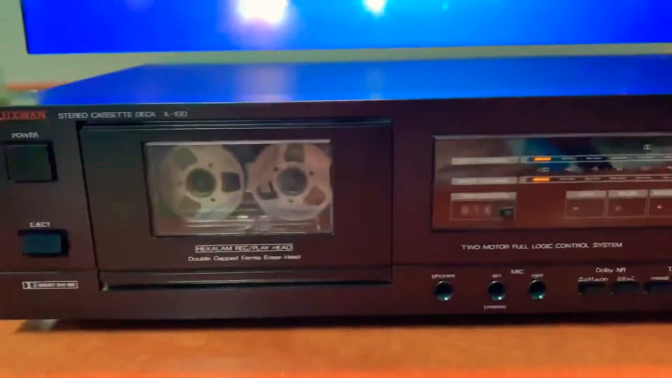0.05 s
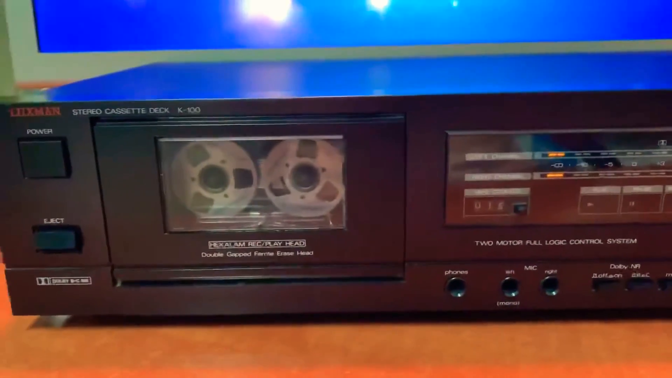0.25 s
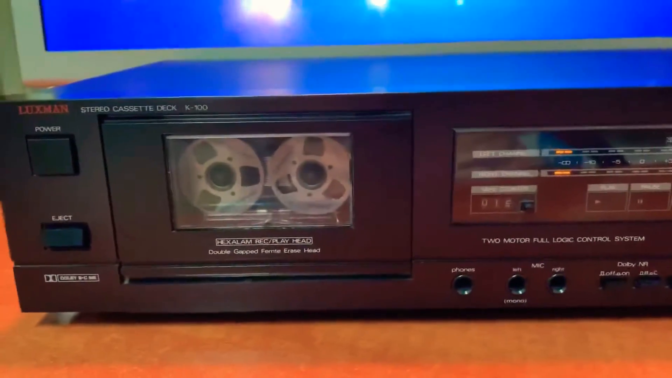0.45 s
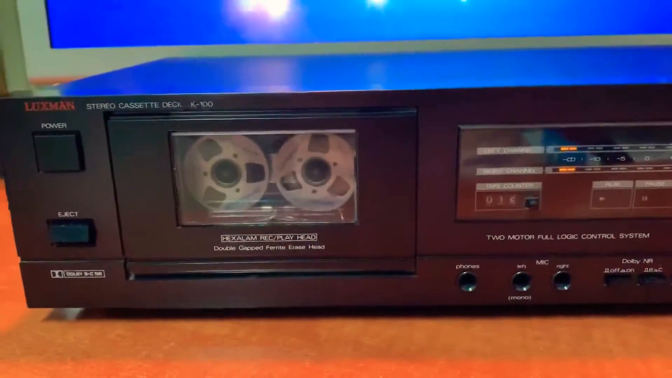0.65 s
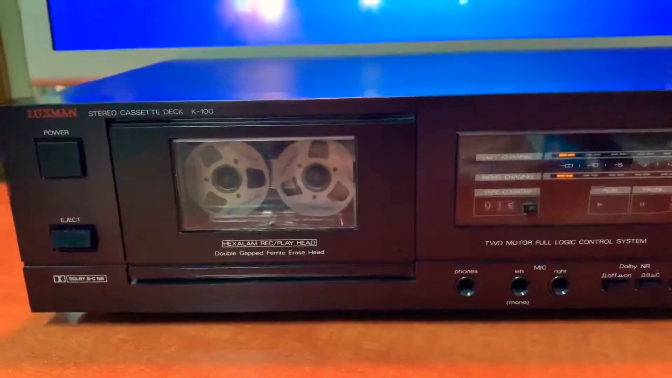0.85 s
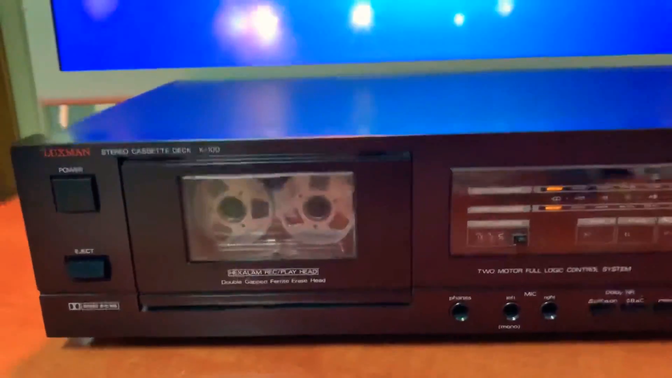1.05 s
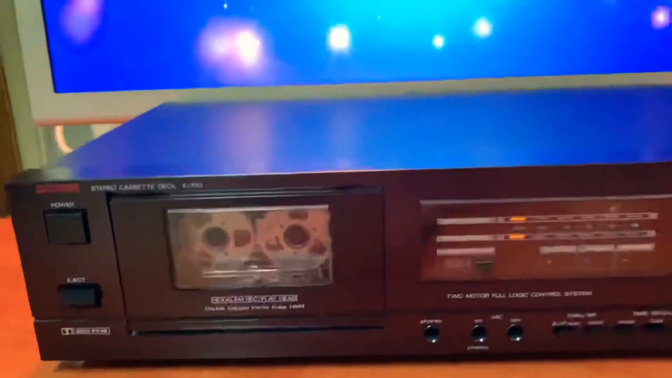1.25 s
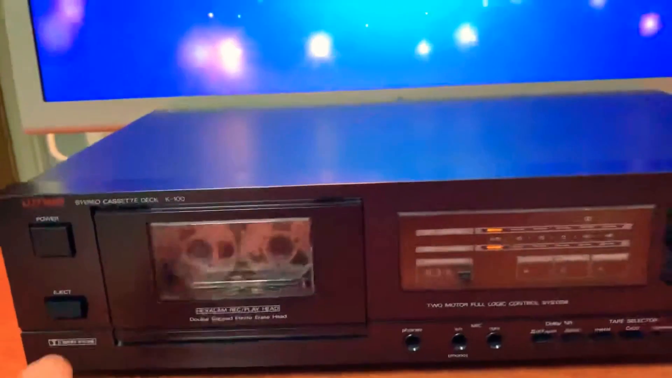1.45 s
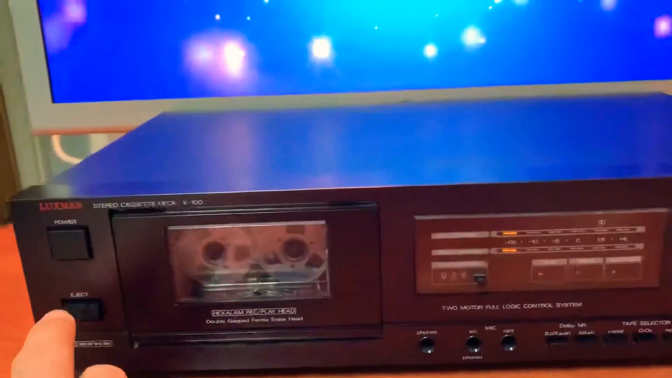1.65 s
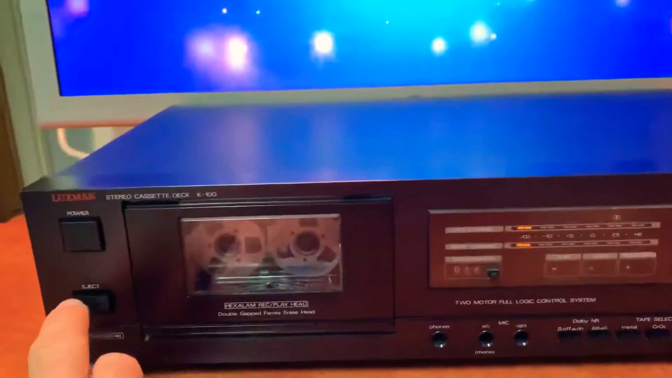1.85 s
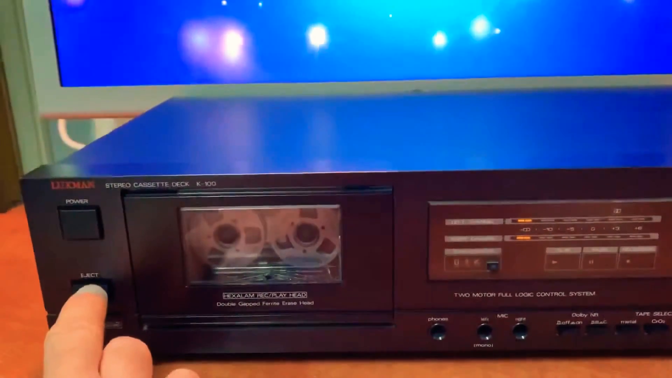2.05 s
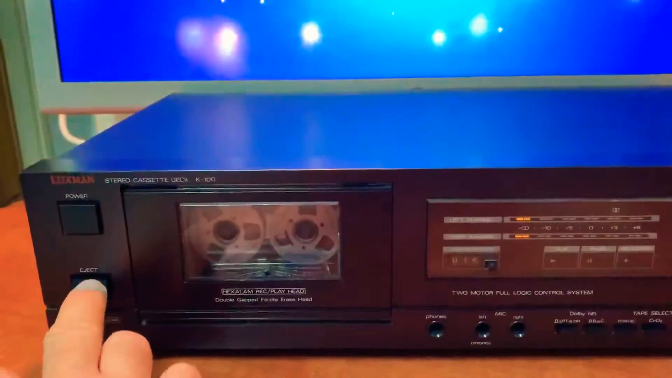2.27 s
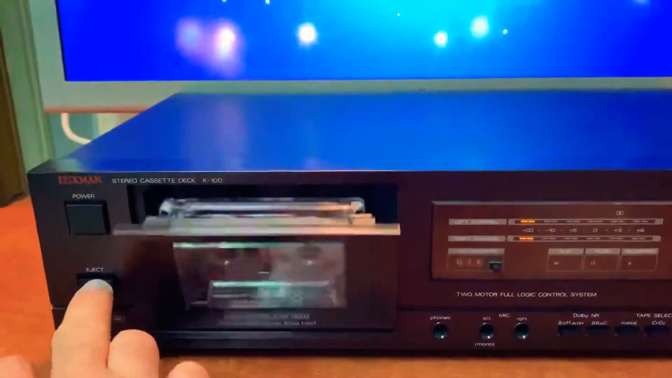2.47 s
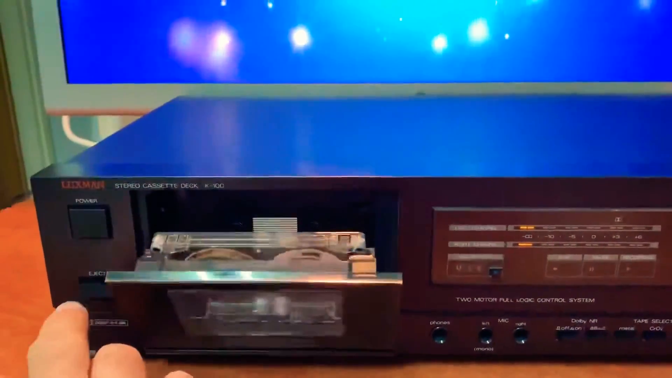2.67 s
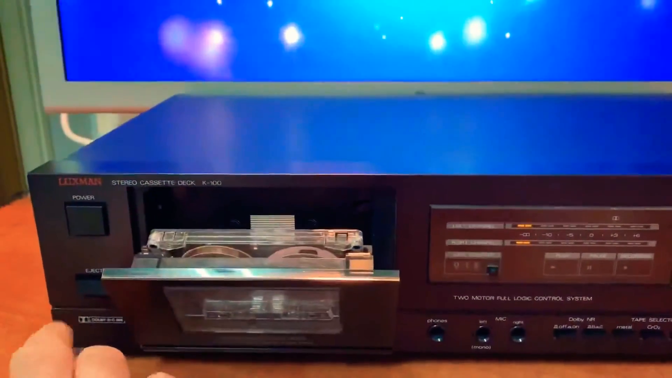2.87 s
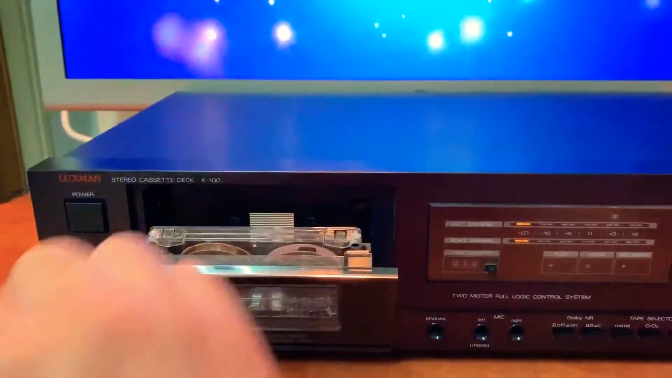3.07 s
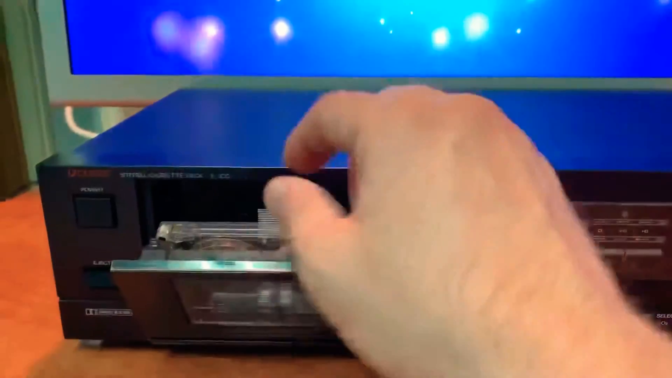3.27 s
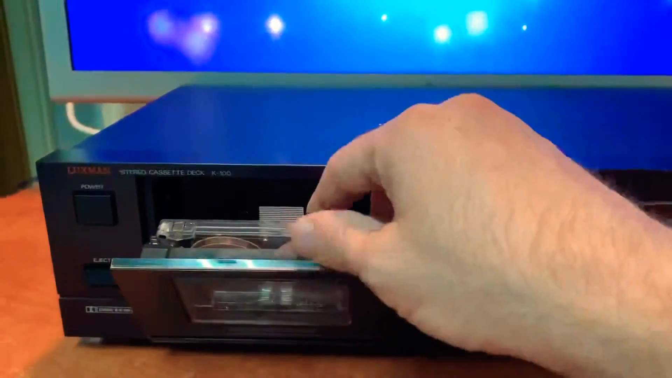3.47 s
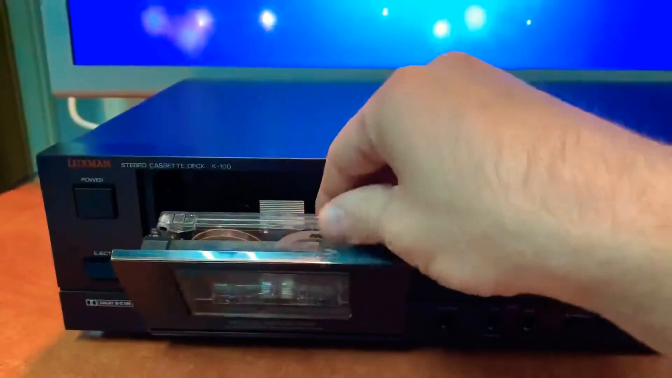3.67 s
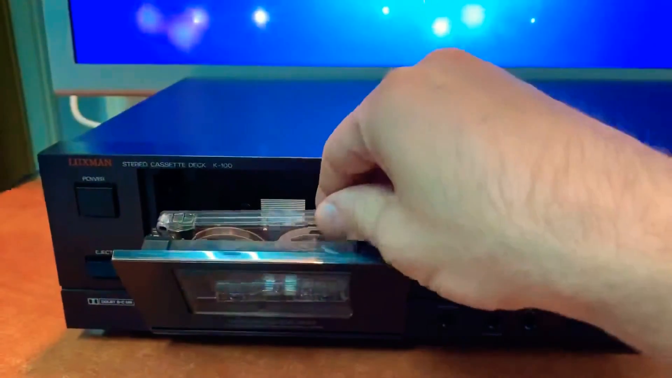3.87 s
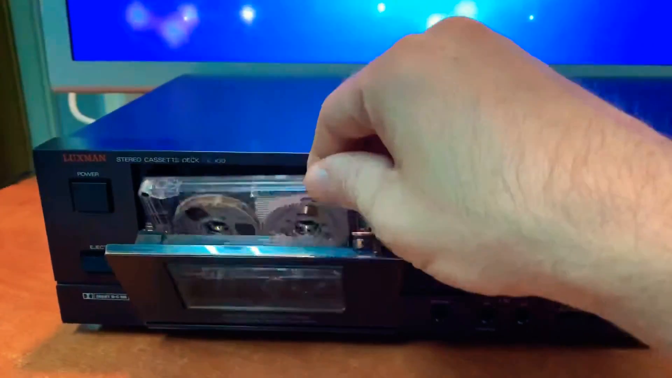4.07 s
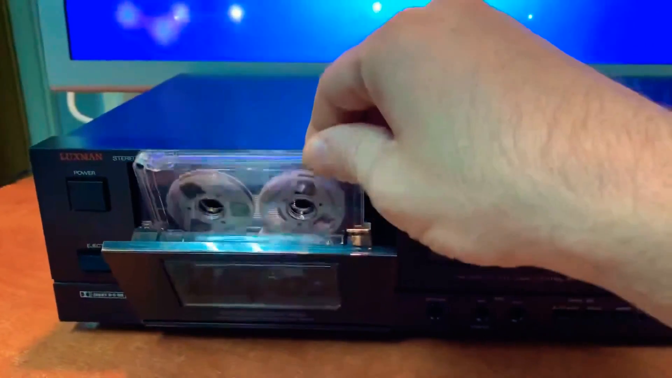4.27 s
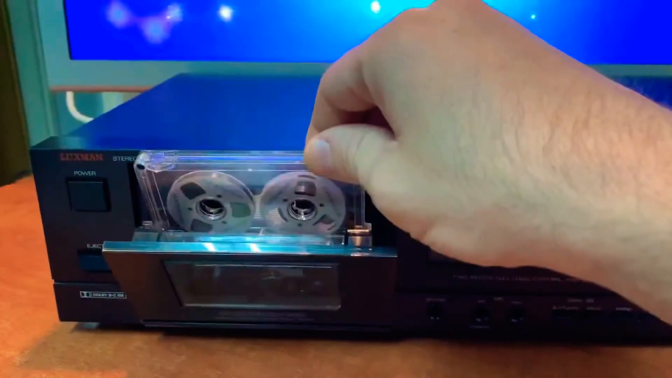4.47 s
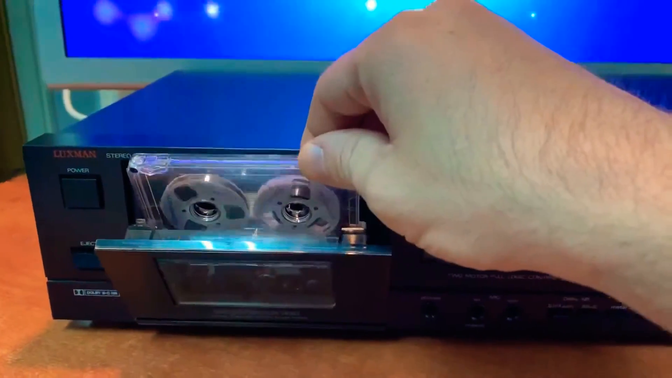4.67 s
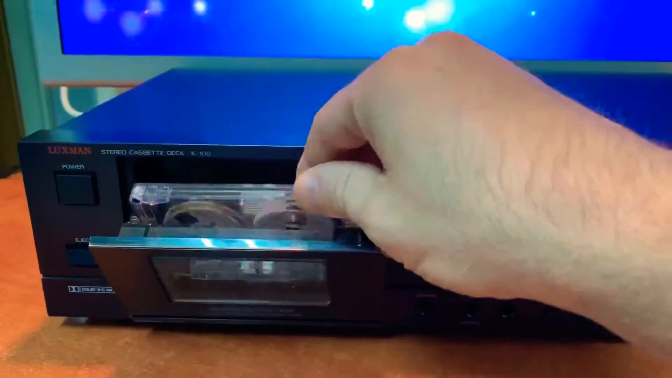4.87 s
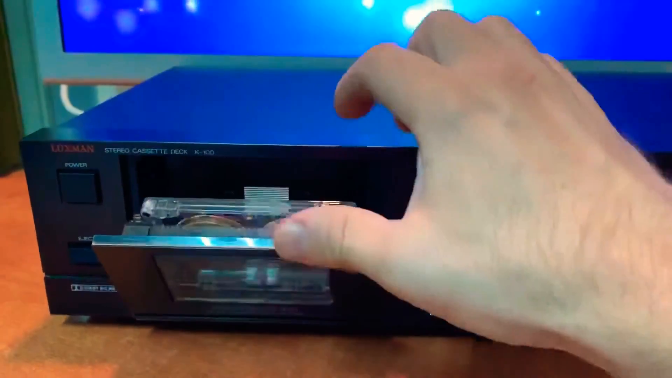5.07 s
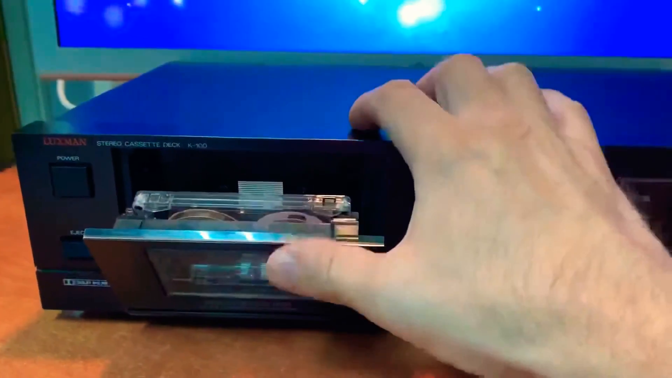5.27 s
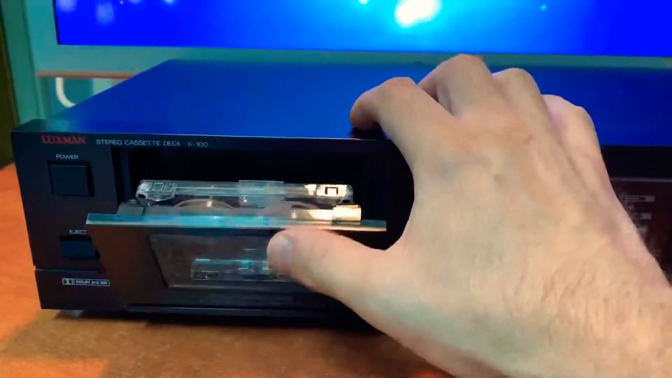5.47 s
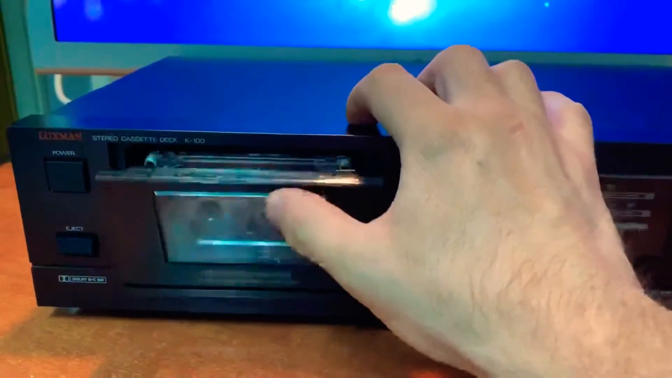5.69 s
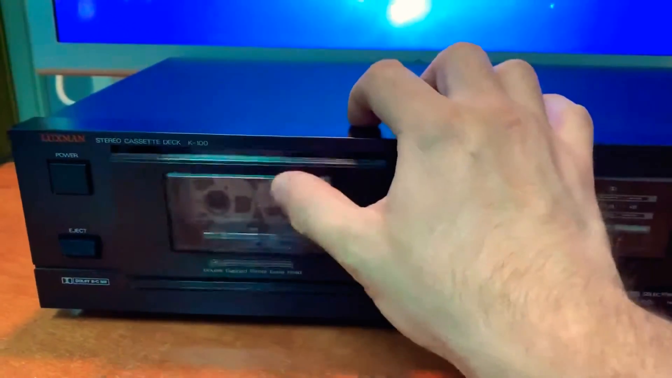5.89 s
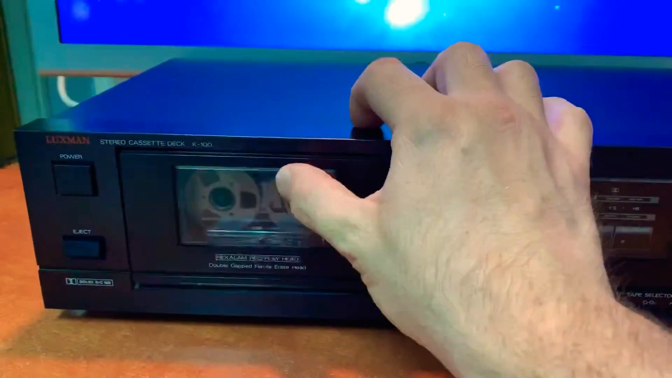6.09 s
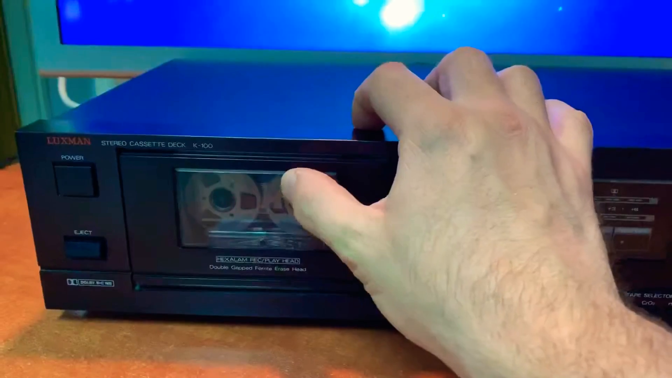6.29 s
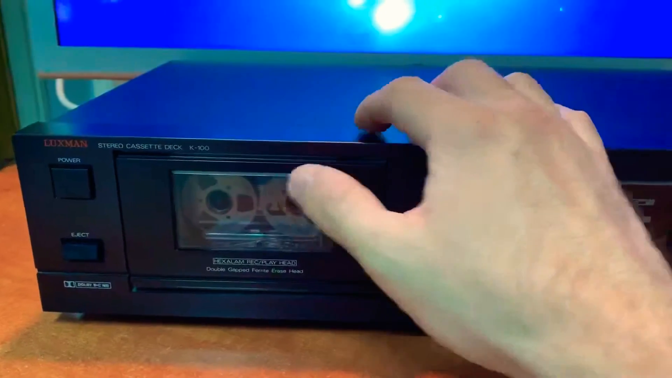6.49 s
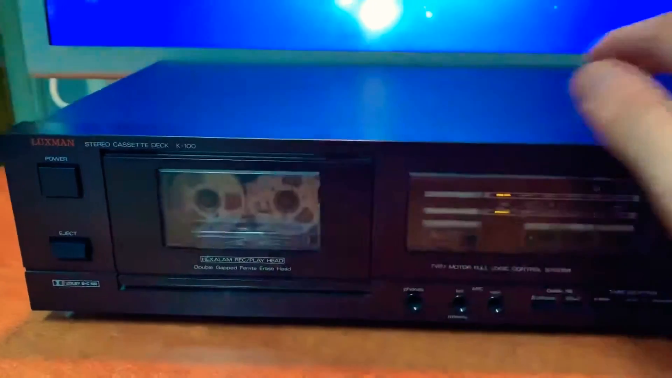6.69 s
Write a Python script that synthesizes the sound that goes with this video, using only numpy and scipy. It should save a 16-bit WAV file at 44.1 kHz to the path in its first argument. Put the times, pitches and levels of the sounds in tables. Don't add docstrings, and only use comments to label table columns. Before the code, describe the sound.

Close stereo phone pickup of a cassette deck on a desk indoors. Over a quiet, slowly rising airy hum come a faraway snap, a firm key press, a brief burst of door rattling and a dull stop. After soft skin rustles and faint taps, the cassette lands with two hard plastic cracks. Finally the door creaks forward in clicks and slams shut, the loudest sound, shaking case and desk with a short room echo.

```python
import sys
import numpy as np
from scipy import signal
from scipy.fft import rfft, irfft, next_fast_len
from scipy.io import wavfile
from scipy.ndimage import uniform_filter1d

SR = 44100
rng = np.random.default_rng(int(sys.argv[2]) if len(sys.argv) > 2 else 0)


def amplitude_ratio(level_db):
    exponent = np.asarray(level_db, float) / 20
    return 10 ** exponent


def unload_audio(sound):
    columns = np.transpose(np.atleast_2d(sound))
    steps = np.round(np.clip(columns, -1, 1) * 32767)
    wavfile.write(sys.argv[1], SR, steps.astype(np.int16))


N = 297234
SIZE = next_fast_len(N + SR)
FREQ = np.fft.rfftfreq(SIZE, 1 / SR) + 1
TIME = np.arange(N) / SR


def unit(x):
    return x / np.sqrt(np.mean(x ** 2))


def over_hz(table, hz=FREQ):
    f, v = np.transpose(table)
    return np.interp(np.log(hz), np.log(f + 1), v)


def shape(x, gain):
    return irfft(rfft(x, SIZE) * gain, SIZE)[..., :N]


def walk(rate):
    k = int(SR / rate)
    steps = np.repeat(rng.standard_normal(N // k + 1), k)
    return unit(uniform_filter1d(uniform_filter1d(steps, k), k)[:N])


def ports(x, phase, balance_db=0):
    half = np.exp(.5j * phase) * amplitude_ratio(balance_db / 2)
    return shape(x, np.array([half, 1 / half]))


def ring(modes, t, chance, spread_db):
    hz, db, t60 = np.transpose(modes)[:, :, None]
    n = len(modes)
    tuned_hz = hz * (1 + .015 * chance[:n, None])
    level = amplitude_ratio(db + spread_db * chance[-n:, None])
    decay = 1000. ** (-t / t60)
    out = np.sum(level * np.sin(2 * np.pi * tuned_hz * t) * decay, axis=0)
    return out / np.max(np.abs(out))


def snap(events, colour):
    out = np.zeros(N)
    for s, db in events:
        out[int(s * SR)] = amplitude_ratio(db)
    return shape(out, amplitude_ratio(over_hz(colour)))


# hz, t60_s
ROOM_T60 = [(200, 0.45), (1000, 0.34), (4000, 0.34), (12000, 0.28)]


def room(x, gain_db):
    t, tail = TIME[:2 ** 14], 0
    near_hz = np.fft.rfftfreq(len(t), 1 / SR) + 1
    lumps = amplitude_ratio(1.5 * np.repeat(rng.standard_normal(len(t) // 64), 64))
    for hz in 125 * 2. ** np.arange(8):
        noise = rng.standard_normal((2, len(t))) + 0.79 * rng.standard_normal(len(t))
        decay = 1000. ** (-t / over_hz(ROOM_T60, hz)) * (1 - np.exp(-t / 0.0012))
        octave = np.exp(-(np.log2(near_hz / hz) / 0.6) ** 2)
        tail = tail + rfft(noise * lumps * decay) * octave
    return shape(x, rfft(irfft(tail), SIZE) * amplitude_ratio(gain_db) / 33)


# start_s, depth_db,
# release_s
DUCKS = [
    (2.62, -1.5, 2.3),
    (5.04, 0, 0.14),
    (6.115, 1.5, .2),
]


def phone_gain_db():
    start_db, creep_db_per_s, attack_s = -9, 3.5, .08
    s, depth_db, release_s = np.transpose(DUCKS)[:, :, None]
    since = np.maximum(TIME - s, 0)
    duck = np.minimum(depth_db, 0) * (1 - np.exp(-since / attack_s)) * np.exp(-since / release_s)
    return np.minimum(start_db + creep_db_per_s * TIME, 0) + duck.sum(axis=0)


# hz, share_0_to_1
BACK_LIKE = [(60, .999), (130, 0.93), (290, 1), (640, 0.63), (1410, 0.069), (3100, 0.091), (6820, .1),
             (15000, 0.15)]


def diffuse(gain):
    lag_s = 12 / 44100
    like = np.clip(over_hz(BACK_LIKE), 0, 1)
    same = ports(shape(rng.standard_normal(N), np.sqrt(like)), -2 * np.pi * FREQ * lag_s)
    own = shape(rng.standard_normal((2, N)), np.sqrt(1 - like))
    return unit(shape(same + own, gain))


# hz, level_db
AIR = [(35, -38), (60, -7.5), (98, -13.5), (151, -11.5), (183, -2.5), (274, -13.5), (386, -14.5),
       (533, -16.5), (853, -24.5), (1200, -25), (1340, -27.5), (2100, -29.5), (3200, -36), (5730, -50.5),
       (8430, -57), (10000, -60.5), (13000, -109), (22000, -120)]
# pitch_hz, width_hz, level_db
DRONE = [(30, 23, -12), (62, 24, -21.5), (117, 8.8, -5), (137.3, 11, -8.5), (187.4, 5.3, 0.5),
         (228.2, 10, -9.5), (299.1, 17, -12.5), (439.2, 8, -10.5), (505.3, 14, -10.5), (545, 6.8, -8.5),
         (1197, 11, -21.5)]
# hz, level_db
HISS = [(6470, -84), (11000, -63), (11200, -44), (11500, -24.5), (13600, -4), (15100, 3.5), (15800, -5)]


def background():
    air_db, drone_db, hiss_db = -40.5, -44, -60.5
    flicker_db, swell_db = .7, 1.5
    gain_db = phone_gain_db()
    air_band = (FREQ > 60) & (FREQ < 9300)
    air_level = amplitude_ratio(air_db + 0.99 * gain_db + flicker_db * walk(4.5))
    air = air_level * diffuse(amplitude_ratio(over_hz(AIR)) * air_band)
    modes = sum(amplitude_ratio(db) ** 2 / (1 + (2 * (FREQ - hz) / width) ** 2) ** 2.5 for hz, width, db in DRONE)
    drone_level = amplitude_ratio(drone_db + 0.99 * gain_db + swell_db * walk(3.61))
    drone = drone_level * diffuse(np.sqrt(modes) / (1 + (22 / FREQ) ** 4))
    hiss_band = (FREQ > 11000) & (FREQ < 15880)
    hiss = amplitude_ratio(hiss_db + gain_db) * diffuse(amplitude_ratio(over_hz(HISS)) * hiss_band)
    return air + drone + hiss


# start_s, low_level_db, high_level_db
HUM = [(0.0, -50, -52), (0.04, -52, -53), (1.12, -52.5, -51), (1.33, -61, -54), (1.67, -49, -48.5),
       (1.97, -60, -49), (2.46, -41, -43), (2.53, -58, -44), (2.98, -41, -46.5), (4.9, -51, -47.5),
       (4.94, -42, -61), (4.99, -43, -46.5), (5.18, -50.5, -47), (6.21, -39.5, -46), (6.59, -53, -50),
       (6.74, -41, -37.5)]
HUM_HZ = (48.6, 74.8)


def hum():
    s, *levels = np.transpose(HUM)
    out = 0
    for hz, db in zip(HUM_HZ, levels):
        phase = 2 * np.pi * np.cumsum(hz * (1 + .012 * walk(4))) / SR
        out = out + amplitude_ratio(np.interp(TIME, s, db) + 3.0) * np.sin(phase)
    return out


# start_s, level_db
FAR = [
    (0.906, -12.5),
    (0.931, -27.5),
    (0.98, -29.5),
]
# hz, level_db
FAR_COLOUR = [(120, -40), (200, -18), (365, 3.5), (585, -6), (923, -0.5), (1560, -9.5), (2290, -5),
              (3070, -12), (4260, -15.5), (8660, -18.5), (9830, -32), (10600, -84), (11800, -22),
              (13400, -14), (15500, -51)]
# pitch_hz, level_db, t60_s
FAR_MODES = [(335, 0, .1), (440, -5, .12), (935, -1, .07), (1250, -9, .05), (1600, -9, .04),
             (2350, -5, .04)]


def far_object():
    far = snap(FAR, FAR_COLOUR)
    t = np.maximum(TIME - FAR[0][0], 0)
    ringing = amplitude_ratio(-27.5) * ring(FAR_MODES, t, np.zeros(6), 0) * (1 - np.exp(-t / 0.0018))
    return amplitude_ratio(-1) * far + ringing + room(far, 23.6)


# start_s, level_db, pitch_hz, t60_s
THUDS = [(0.932, -34, 288, 0.098), (0.974, -38, 181, 0.1), (2.103, -20, 226, 0.062), (2.42, -26, 241, 0.19),
         (2.518, -30, 192, 0.19), (2.597, -20, 196, 0.054), (2.633, -24, 193, 0.22),
         (5.044, -24.5, 227.4, 0.17), (5.073, -18, 245, 0.14), (5.108, -26, 191, 0.16),
         (5.12, -26.5, 306, 0.21), (6.114, -14.5, 216, 0.12), (6.129, -19.5, 216.6, 0.3),
         (6.16, -21, 226, 0.13), (6.202, -18.5, 227, 0.11), (6.648, -26, 196.4, 0.32)]


def case():
    out, t = np.zeros(N + SR), TIME[:SR // 3]
    for (s, db, hz, t60), chance in zip(THUDS, rng.standard_normal((len(THUDS), 6))):
        i = int(s * SR)
        modes = [(hz, 0, t60), (105, -8, t60), (1.7 * hz, -9, 0.4 * t60)]
        out[i:i + len(t)] += amplitude_ratio(db) * ring(modes, t, chance, 1.0) * (1 - np.exp(-t / 0.0017))
    return out[:N]


# peak_s, level_db, rise_s, fall_s
STROKES = [(1.33, -59.5, 0.054, 0.15), (1.486, -60.5, 0.15, 0.39), (1.864, -69, 0.042, 0.1),
           (3.21, -64.5, 0.047, .09), (3.604, -61, .02, .05), (3.74, -68, .05, .12),
           (3.972, -51, .015, .015), (3.99, -66, .02, .7), (4.224, -64, 0.018, .05),
           (4.352, -74, 0.026, 0.049), (4.94, -70, .45, 0.022), (5.022, -50.5, .04, .015)]
# hz, level_db
RUB_COLOUR = [(3000, -14.5), (5000, -14.5), (6500, -17), (8000, -8.5), (8800, -11), (9300, -36),
              (11500, -39.5), (12300, -9.5), (15000, -21.5)]


def rubs():
    level = 0
    for s, db, rise, fall in STROKES:
        away = np.maximum((s - TIME) / rise, (TIME - s) / fall)
        level = level + amplitude_ratio(db - 25 * away)
    grain = rng.standard_normal((2, N)) + 1.2 * rng.standard_normal(N)
    grain = grain * amplitude_ratio(1.2 * walk(150))
    return amplitude_ratio(1.0) * level * unit(shape(grain, amplitude_ratio(over_hz(RUB_COLOUR))))


def crunch(ms, noise):
    push = noise * np.abs(noise) * np.exp(-np.arange(len(noise)) / (max(ms, .1) * SR / 1000))
    return push / np.sqrt(np.sum(push ** 2))


# start_s, clack_level_db, clack_pitch_hz, crack_db relative to the clack
EJECT = [(1.492, -44, 923, -13), (2.092, -24, 1260, -26), (2.388, -34.5, 1440, -4), (2.403, -43, 851, -19),
         (2.425, -23, 1180, -19.5), (2.438, -23, 1210, -23), (2.45, -23, 1220, -12),
         (2.467, -47, 1220, 8.5), (2.493, -29, 885, 0.5), (2.576, -24, 1420, -22), (2.59, -24, 1026, -24),
         (2.744, -26, 1270, -44)]
LIFT = [
    (3.57, -38, 1260, -16),
    (3.969, -26, 885, -27),
    (4.222, -43.5, 759, -2.5),
    (4.356, -42.5, 770, -7.5),
]
DROP = [
    (4.971, -38, 1340, -16),
    (5.027, -30, 1406, -7.5),
    (5.039, -10.5, 1350, 1),
    (5.049, -20, 1278, -14),
    (5.059, -9.5, 1420, -5),
    (5.075, -23, 1490, -18.5),
]
PUSH = [
    (5.694, -56, 1200, -12),
    (5.861, -34, 958, -29),
    (5.937, -30, 1377, -16),
    (6.011, -27, 1190, -14.5),
    (6.0595, -18, 1096, -12),
    (6.078, -27, 1290, -21),
    (6.086, -36, 750, 2),
]
LATCH = [
    (6.09, -14.5, 1300, -15.5),
    (6.107, -6, 1318, -12.5),
    (6.117, -5, 1140, -3.5),
    (6.126, -18, 1180, -17),
    (6.348, -33, 1290, -29),
]
TAPS = [
    (3.668, -44, 950, -18),
    (4.061, -40.5, 1320, -10.5),
    (4.809, -45.5, 891, -11),
    (4.9, -38, 1220, -16.5),
    (6.385, -49, 976, -17),
]
# pitch_hz, level_db, t60_s
HIGH_RING = [(8560, -1, 0.022), (12000, -9.5, 0.034)]
# pitch_hz, level_db, t60_s
DOOR = [(420, -10, .07), (560, -11, .06), (718, -13, .06), (785, -10, .06), (990, -8, .06), (1195, -7, .08),
        (1405, -9, .06), (1620, -18, .03), (1863, -9, .06), (2290, -15, .03)]
# hz, level_db
CRACK = [(1180, -3), (2000, -6.5), (2790, -8.5), (3760, -8), (4860, -11.5), (5740, -12), (6900, -11.5),
         (7600, -20.5), (8520, -11), (9300, -15), (10500, -6), (11300, -13), (13900, -7.5), (15600, -21.5),
         (16300, -31)]


def deck():
    # contacts, contact length in ms, top of the crack in dB relative to the crack
    actions = [(EJECT, 8, -6), (LIFT, 4.3, -21), (DROP, 1.7, -5),
               (PUSH, 2.6, -15.5), (LATCH, 4.9, -1), (TAPS, 1.5, -12)]
    hits = [(*row, ms, top_db) for rows, ms, top_db in actions for row in rows]
    body, t = np.zeros(N + SR), TIME[:SR // 8]
    crack, bang = np.zeros((2, 2, N + SR))
    for (s, db, hz, crack_db, ms, top_db), chance in zip(hits, rng.standard_normal((len(hits), 640))):
        push, i = crunch(ms, chance[40:]), int(s * SR)
        onset = 1 - np.exp(-t * 2500 / max(ms, .1))
        clack = ring([(hz, 0, .025), (1300, -4, .018), (850, -5, .02)], t, chance[:6], 0)
        panel = amplitude_ratio(-7 + .6 * (db + 10)) * ring(DOOR, t, chance[6:26], spread_db=3)
        high_ring = amplitude_ratio(crack_db - 9.5) * ring(HIGH_RING, t, chance[26:30], 2.5)
        body[i:i + len(t)] += amplitude_ratio(db) * (onset * (clack + panel) + high_ring)
        sharp = amplitude_ratio(db + crack_db + np.array([0, top_db]))
        crack[:, i:i + len(push)] += sharp[:, None] * push
        bang[:, i] += sharp
    upper = 1 / (1 + (10500 / FREQ) ** 16)
    bands = np.array([amplitude_ratio(28.5) * (1 - upper), amplitude_ratio(24.5) * upper])
    colour = amplitude_ratio(over_hz(CRACK)) * bands / (1 + (800 / FREQ) ** 2)
    return body[:N] + shape(crack, colour).sum(axis=0), body[:N] + shape(bang, colour).sum(axis=0)


# start_s, level_db
GEAR = [
    (2.38, -53),
    (2.39, -39),
    (2.456, -46.5),
    (2.48, -51),
    (2.494, -45),
    (2.592, -43.5),
    (2.63, -56),
]
# pitch_hz, level_db, t60_s
GEAR_MODES = [(950, -3, 0.011), (1220, -10, 0.034), (1440, -5.5, 0.023), (2040, -2.5, 0.011)]


def gear():
    teeth = (rng.random(N) < 250 / SR) * rng.standard_normal(N)
    chatter = np.convolve(teeth, ring(GEAR_MODES, TIME[:1000], np.zeros(4), 0))[:N]
    level_db = np.interp(TIME, *np.transpose(GEAR), left=-200, right=-200)
    return unit(chatter) * amplitude_ratio(level_db - 4.5)


# hz, phase_rad
DECK_PHASE = [(0, 0), (1210, 0.3), (1890, -0.7), (2330, -4.0), (2930, -3.7), (4740, 0.4), (5000, -1.1),
              (5340, 4.0), (5860, 3.1), (6460, 7.6), (7150, 6.3), (14600, -0.8), (15700, -3.0),
              (16000, -0.7)]
# hz, balance_db
DECK_BALANCE = [(60, 0.0), (110, -0.5), (200, -0.5), (380, 0.0), (700, 0.5), (1290, 5.0), (2380, 4.5),
                (4400, 3.0), (8120, 0.0), (15000, 0.5)]
# hz, level_db
ROOM_DB = [(200, -5), (1000, -6), (2500, -5.5), (5000, -7), (9200, -9), (9800, -27.5), (10900, -32.5),
           (11500, -5), (14000, -6.5), (15500, -17.5)]


def deck_in_place():
    near, spread = np.array(deck()) + gear()
    direct = ports(near, np.interp(FREQ, *np.transpose(DECK_PHASE)), over_hz(DECK_BALANCE))
    desk = shape(near, amplitude_ratio(-13) * np.exp(-2j * np.pi * FREQ * .0011))
    return amplitude_ratio(3.5) * (direct + desk) + room(spread, over_hz(ROOM_DB))


# start_s, level_db
STOP = [
    (2.4976, -11.5),
    (2.5185, -22),
    (2.5424, -27),
]
# hz, level_db
STOP_COLOUR = [(180, -30), (300, 8), (453, -1.5), (543, -6), (907, -2.5), (985, -6), (5850, -15.5),
               (8700, -14), (10100, -46), (11900, -15.5), (15500, -26)]


def door_stop():
    return room(snap(STOP, STOP_COLOUR), 23.4)


def scene():
    room_tone = background() + hum()
    contacts = deck_in_place() + door_stop() + case()
    return room_tone + far_object() + rubs() + contacts


def roll_off(x):
    return signal.sosfilt(signal.butter(12, 16470, fs=SR, output="sos"), x)


def record(dry):
    clip_level, top_hz = .87, 16300
    clipped = np.clip(dry, -clip_level, clip_level)
    mix = shape(clipped, np.clip((top_hz - FREQ) / top_hz * 20, 0, 1))
    return roll_off(mix)


dry = scene()
out = record(dry)
unload_audio(out)
```